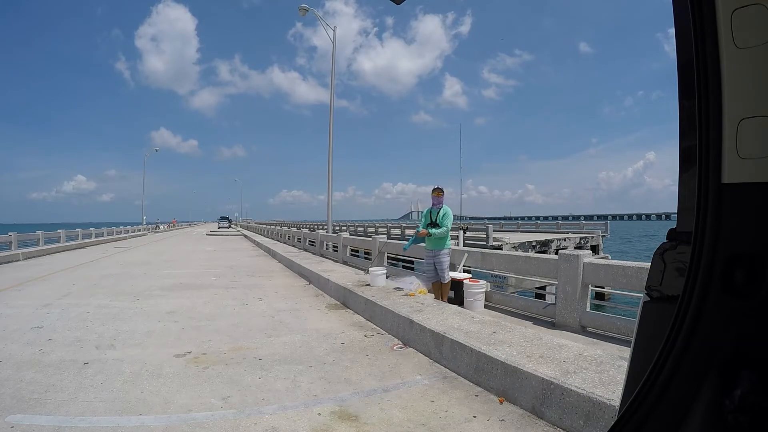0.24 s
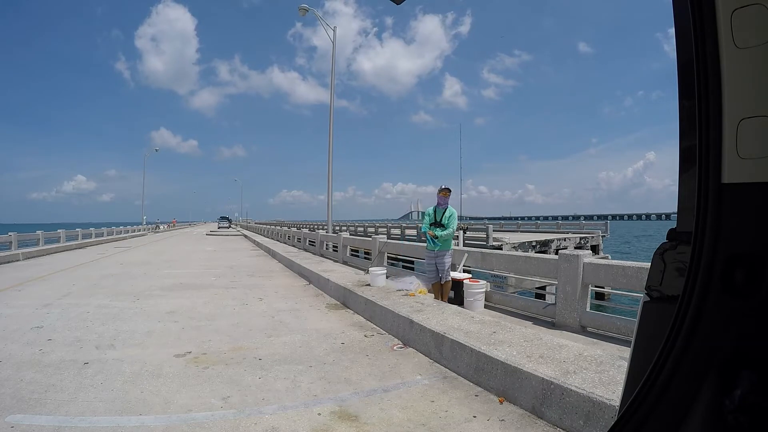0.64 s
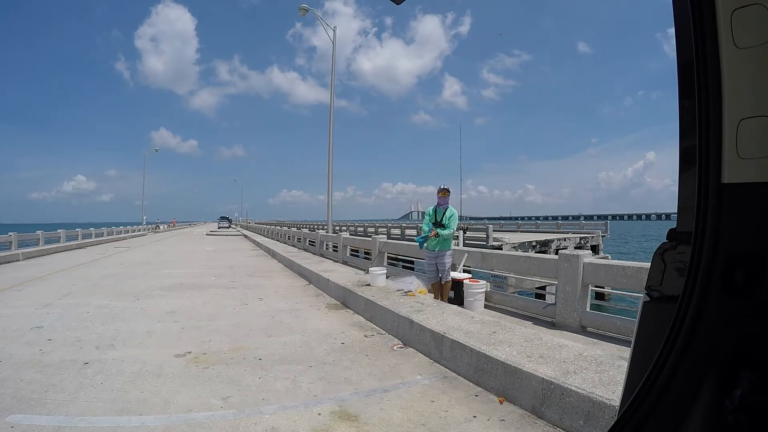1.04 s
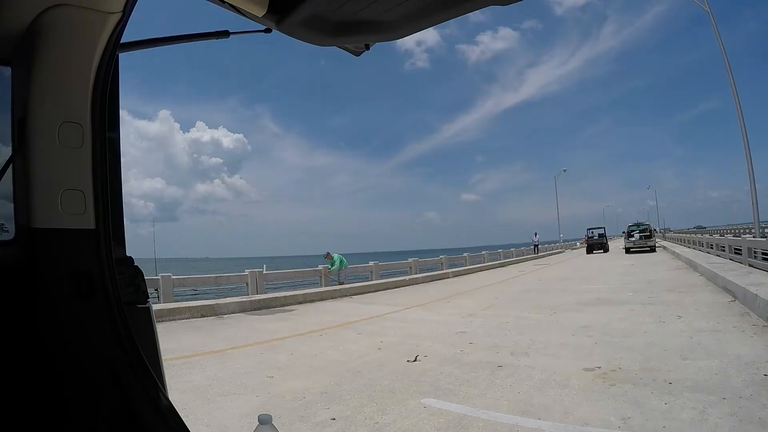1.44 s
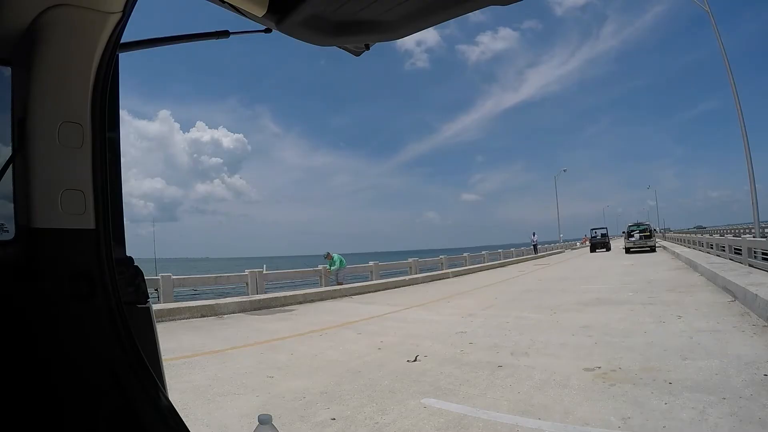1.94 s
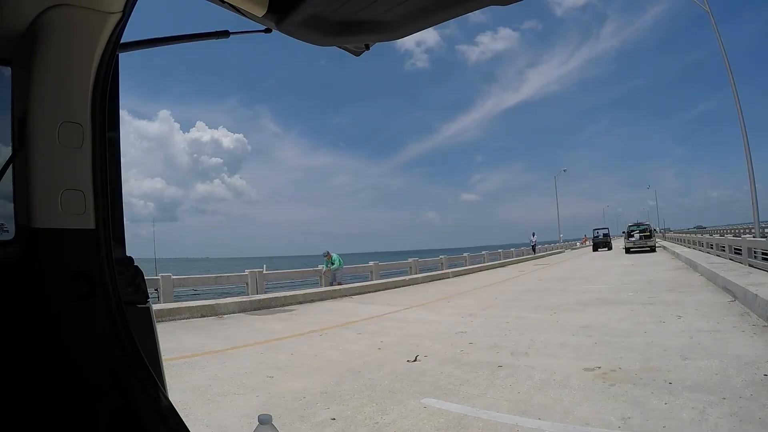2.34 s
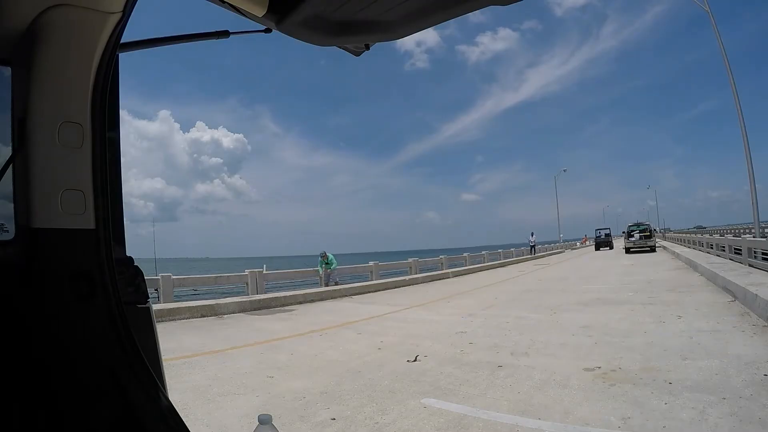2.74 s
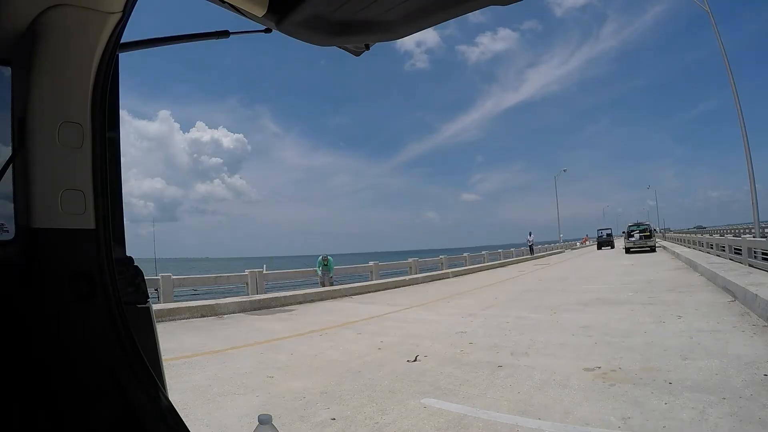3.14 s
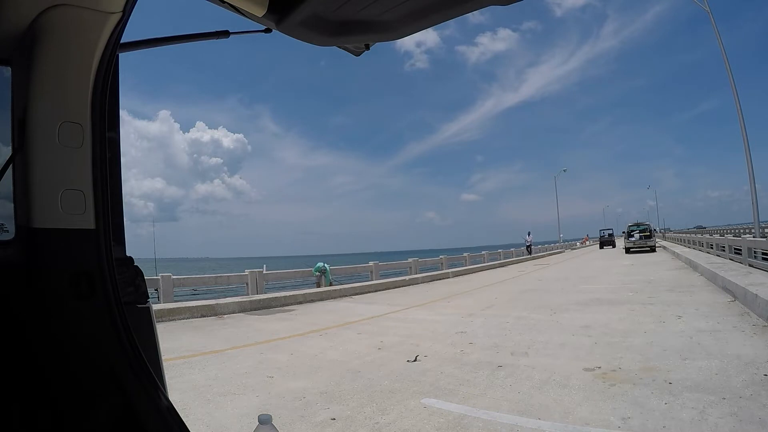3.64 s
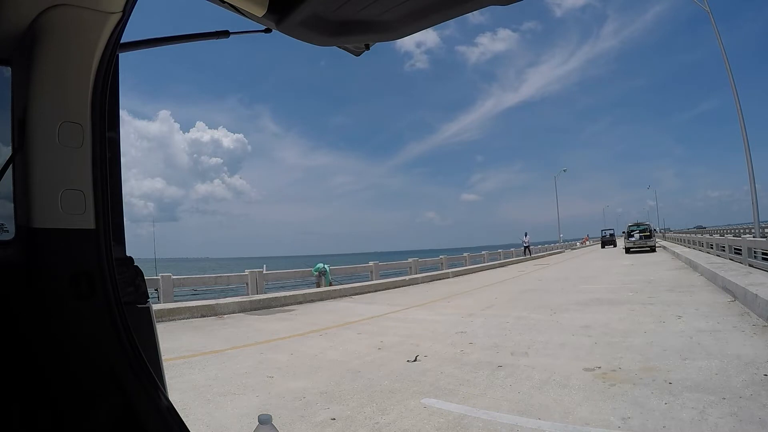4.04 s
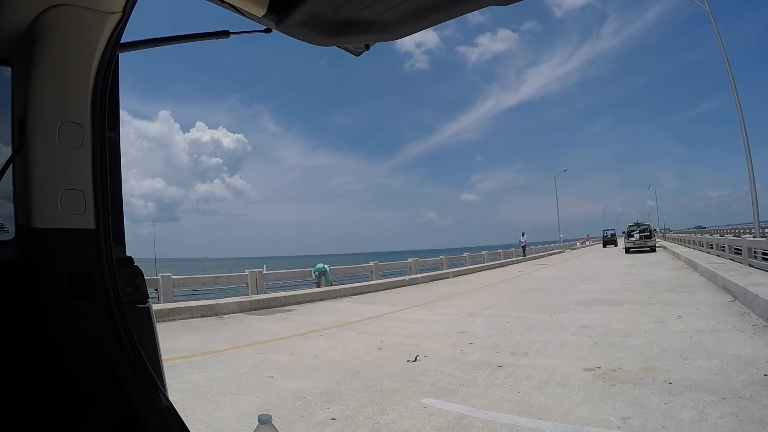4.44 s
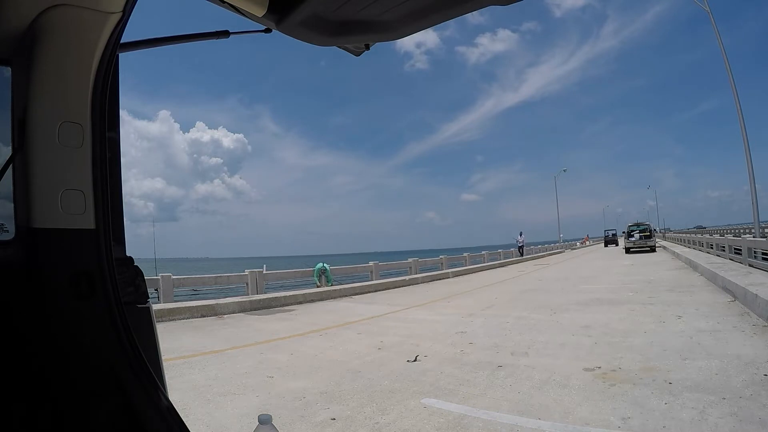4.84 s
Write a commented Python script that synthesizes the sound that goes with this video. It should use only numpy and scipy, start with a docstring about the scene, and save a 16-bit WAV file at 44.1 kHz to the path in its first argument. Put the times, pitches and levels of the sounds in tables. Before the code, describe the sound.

Outdoors on a pier, a quiet wash of wind and hiss lasts about a second before switching abruptly to a van idling near the microphone. Its low, pulsing exhaust hum carries a faint hollow drone from the body, fine mechanical clatter and a slight belt whine. Just past the middle, the engine speeds up a touch, then relaxes into a softer, darker idle that runs to the end.

```python
"""A van's engine idles close by on a long pier, heard at the open tailgate. Each firing sends a pulse
through the exhaust, a harmonic series, and knocks the block and hollow body into resonance; gears and
belts whine and air rushes in time. Near 3 s the load drops: the speed overshoots and settles, the sound
gets quieter and the exhaust slowly darkens. For the first 1.1 s there is only sea wind and distant hiss."""
import sys
import numpy as np
from scipy import signal
from scipy.fft import rfft, irfft
from scipy.io import wavfile
from scipy.ndimage import uniform_filter1d

SR = 44100
rng = np.random.default_rng(int(sys.argv[2]) if len(sys.argv) > 2 else 0)


def int16_out(signal):
    """Quantize to a 16-bit WAV file."""
    q = np.round(np.clip(np.atleast_2d(signal).T, -1, 1) * 32767)
    wavfile.write(sys.argv[1], SR, q.astype(np.int16))


N = 224468
TIME, HZ = np.arange(N) / SR, np.arange(N // 2 + 1) * SR / N

# Coherence of the two microphone ports: (frequency [Hz], shared power [0-1])
PORT_COHERENCE = [(30, 0.9), (60, 0.95), (150, 0.95), (400, 1), (1000, 0.88), (2000, 0.75), (4000, 0.45),
                  (7000, 0.11), (12000, 0.45)]
# Balance of the ports: (frequency [Hz], left minus right [dB])
PORT_BALANCE = [(60, -0.6), (690, -0.4), (1270, 0.5), (2330, -2), (4290, -3.5), (7890, -5.5), (14500, 0.5)]
# Spectra of sea wind, background rumble and engine air: (frequency [Hz], relative density [dB])
WIND_SPECTRUM = [(9, -36), (15, -8), (33, -3), (57, -2), (135, -18), (214, -21.5), (255, -25.5),
                 (400, -29.5), (700, -31.5), (1050, -30), (2000, -36.5), (3500, -46), (6000, -55),
                 (10000, -54.5), (15000, -61)]
RUMBLE_SPECTRUM = [(15, 0), (30, -1.5), (48, 3), (75, -2), (120, -4.5), (180, -10), (270, -14), (350, -11),
                   (460, -15), (650, -18), (780, -22.5), (1050, -15.5), (1300, -24.5), (2000, -49)]
AIR_SPECTRUM = [(410, -34), (700, -15), (1050, -9), (1670, -10.5), (2080, -7.5), (2430, -14), (4000, -18.5),
                (7500, -21.5), (9500, -24.5), (12000, -33.5), (14000, -42), (15000, -61)]
# Envelopes of engine air, body drone and block clatter: (time [s], gain [dB])
AIR_GAIN = [(1.14, -47), (2.0, -46.5), (2.2, -45), (2.46, -48), (2.62, -45), (3.05, -50), (4.4, -51),
            (4.7, -48.5), (5.09, -50.5)]
DRONE_GAIN = [(1.14, -52), (2.0, -48), (2.2, -51), (2.36, -43.5), (2.55, -50), (2.75, -47.5), (3.6, -51),
              (4.1, -47.5), (4.65, -54), (5.09, -52.5)]
CLATTER_GAIN = [(1.14, -43.5), (1.8, -41.5), (2.25, -48), (2.55, -43.5), (3.3, -46), (4.0, -45),
                (4.57, -49), (4.8, -46), (5.09, -45.5)]
# Modes of the hollow body and engine block: (frequency [Hz], width [Hz], relative level [dB])
BODY_MODES = [(531.4, 31, -4.5), (572.5, 21.5, 0), (641, 72, -2)]
BLOCK_MODES = [(1379, 65, -4), (1560, 56, -1.5), (1651, 45, -0.5), (1763, 40, -5), (2051, 100, -2),
               (2774, 160, -12.5), (2955, 44, -13.5), (3248, 110, -9.5), (3538, 146, -12), (4440, 52, -13),
               (5210, 80, -14.5), (7120, 150, -23)]
# Gear and belt tones: (multiple of the firing rate [1], amplitude relative to the clatter [dB])
WHINE_ORDERS = [(33, -20), (36, -18), (50, -8), (51, -13), (54, -17), (57, -15)]
# Engine speed: (time [s], firing rate [Hz])
FIRING_RATE = [(1.14, 30.668), (1.88, 30.749), (2.87, 31.618), (3.12, 30.931), (4.1, 30.257),
               (5.09, 30.572)]
# Resonances of silencer and tailpipe: (frequency [Hz], width [Hz], phase lag [rad])
PIPE_MODES = [(62, 24, .6), (150, 44, 2.2)]
# Exhaust harmonics with and without load: (multiple of the firing rate [1], relative level [dB])
LOADED_HARMONICS = [(1, -2.5), (2, -3), (3, -2), (4, -2.5), (5, 1), (6, -11.5), (7, -5), (8, -7.5),
                    (9, -21), (10, -19), (11, -11.5), (12, -7.5), (13, -17.5), (14, -27), (17, -16)]
UNLOADED_HARMONICS = [(1, -3.5), (2, -1.5), (3, -0.5), (4, -5.5), (5, -1.5), (6, -18.5), (7, -20.5),
                      (8, -16), (9, -23), (10, -19.5), (11, -17), (12, -12), (13, -22), (14, -25),
                      (17, -20)]

AIR_LAG_S, ENGINE_LAG_S = 6.34 / SR, 4.7 / SR  # later arrival at the left port


def undb(db):
    """Amplitude ratio of a level in decibels."""
    return 10 ** (np.asarray(db) / 20)


def level(x, db):
    """Scaling to a given rms level."""
    return x * undb(db) / np.sqrt(np.mean(x ** 2))


def along(table):
    """Linear interpolation of a time table at every sample."""
    return np.interp(TIME, *np.transpose(table))


def across(table):
    """Interpolation of a spectrum on a log-frequency axis."""
    hz, value = np.transpose(table)
    return np.interp(np.log(HZ + 1), np.log(hz), value)


def walk(rate_hz):
    """Slow random modulation: held values, smoothed twice, with a spread near 1."""
    hold = int(SR / rate_hz)
    steps = np.repeat(rng.standard_normal(N // hold + 1), hold)
    return 1.37 * uniform_filter1d(uniform_filter1d(steps, hold), hold)[:N]


def fall(middle_s, length_s):
    """Half-cosine transition from 1 to 0."""
    return .5 - .5 * np.sin(np.pi * np.clip((TIME - middle_s) / length_s, -.5, .5))


def port_noise(lag_s):
    """Partial coherence: two noise spectra share a part that reaches the left port late."""
    shared, left, right = rfft(rng.standard_normal((3, N)))
    share = np.clip(across(PORT_COHERENCE), 0, 1)
    late = shared * np.exp(-2j * np.pi * HZ * lag_s)
    tilt = undb(across(PORT_BALANCE) / 2)
    pair = np.sqrt(share) * np.array([late, shared]) + np.sqrt(1 - share) * np.array([left, right])
    return pair * np.array([tilt, 1 / tilt])


def rush(spectrum, swell_db, flicker_db):
    """Modulated flow noise: octave bands swell together and flicker independently; rms 1."""
    noise = port_noise(AIR_LAG_S) * undb(across(spectrum))
    swell, out = swell_db * walk(5.04), 0
    for octave in range(3, 15):
        band = np.clip(1 - abs(np.log2(HZ + 1) - octave), 0, 1)
        out += irfft(noise * band, N) * undb(swell + flicker_db * walk(14))
    return level(out, 0)


def sea_wind():
    """Broadband noise: the wind's power lies in the bass, with distant hiss above it."""
    return rush(WIND_SPECTRUM, swell_db=.33, flicker_db=.68) * undb(-39.5)


def pulsation(cycles, depth_db, decay_cycles):
    """Amplitude modulation: the gain jumps once a firing, by a varying amount, then decays."""
    firing = np.floor(cycles).astype(int)
    size = 1 + .2 * rng.standard_normal(N // 1000)[firing - firing[0]]
    gain_db = depth_db * size * np.exp(-(cycles - firing) / decay_cycles)
    return undb(uniform_filter1d(gain_db, size=260))


def engine_air(cycles, brightness):
    """Flow noise of gas and fan pulses with the firings; under load faster gas hisses brighter."""
    air = rush(AIR_SPECTRUM, swell_db=.29, flicker_db=.84)
    air *= pulsation(cycles + .18, depth_db=5, decay_cycles=.43) * undb(along(AIR_GAIN))
    treble = signal.sosfilt(signal.butter(2, 10000, "high", fs=SR, output="sos"), air)
    return air + .63 * brightness * treble


def ring(cycles, modes, knock_db, waver_db):
    """Forced vibration: firing knocks and pulsing valve noise drive modes that each waver in level."""
    valves = irfft(port_noise(ENGINE_LAG_S), N) * pulsation(cycles + .043, depth_db=1.4, decay_cycles=1)
    fired = np.diff(np.floor(cycles + .003 * walk(5)), prepend=0) == 1
    knocks = rfft(level(fired * undb(1.8 * walk(20)), knock_db))
    drive = rfft(valves) + np.array([knocks * np.exp(-2j * np.pi * HZ * ENGINE_LAG_S), knocks])
    out = 0
    for centre_hz, width_hz, db in modes:
        response = 1 / (1 + 2j * (HZ - centre_hz) / width_hz) ** 2
        out += level(irfft(drive * response, N), db) * undb(waver_db * walk(4.17))
    return level(out, 0)


def body_drone(cycles):
    """Resonance of the van's hollow body, driven by the engine."""
    return ring(cycles, BODY_MODES, knock_db=-3, waver_db=.57) * undb(along(DRONE_GAIN))


def whine(cycles):
    """Engine orders: gears and belts give wavering tones at multiples of the firing rate."""
    tones = sum(undb(db + 2 * walk(2.97)) * np.sin(2 * np.pi * order * cycles + .5 * walk(6))
                for order, db in WHINE_ORDERS)
    return np.array([np.roll(tones, round(ENGINE_LAG_S * SR)), tones])


def block_clatter(cycles):
    """Impact excitation of the block's high modes; the whine shares their envelope."""
    clatter = ring(cycles, BLOCK_MODES, knock_db=-4, waver_db=.6)
    return (clatter + whine(cycles)) * undb(along(CLATTER_GAIN))


def exhaust(cycles, load, brightness, loaded_db=-31.5, unloaded_db=-35.5, lead_rad=.75):
    """Superposition: harmonics sum to one suction pulse a firing; those near a pipe resonance lag."""
    idle_hz = FIRING_RATE[0][1]
    swell_db, pulses = .5 * walk(15), 0
    for (order, on_db), (_, off_db) in zip(LOADED_HARMONICS, UNLOADED_HARMONICS):
        lag = sum(rad / (1 + (2 * (order * idle_hz - hz) / width) ** 2) for hz, width, rad in PIPE_MODES)
        db = brightness * on_db + (1 - brightness) * off_db + swell_db + 1.11 * walk(5.966)
        jitter = .023 * (order + 4) * walk(7.1)
        pulses -= undb(db) * np.cos(2 * np.pi * order * cycles + lead_rad - lag + jitter)
    pulses /= np.sqrt(uniform_filter1d(pulses ** 2, SR // 4))  # running rms of 1
    pulses *= undb(load * loaded_db + (1 - load) * unloaded_db)
    return np.array([np.roll(pulses, round(ENGINE_LAG_S * SR)) * undb(-.3), pulses])


def engine(first_firing_s=1.1495):
    """Periodic excitation: one phase, the integral of the firing rate, times every part."""
    cycles = np.cumsum(along(FIRING_RATE)) / SR
    cycles -= cycles[int(first_firing_s * SR)]
    load = fall(middle_s=2.985, length_s=.73)
    brightness = fall(middle_s=3.4, length_s=1.3)  # the treble fades later and more slowly
    pipe = exhaust(cycles, load, brightness)
    return pipe + block_clatter(cycles) + body_drone(cycles) + engine_air(cycles, brightness)


def scene(wind_end_s=1.1327, engine_start_s=1.143):
    """The wind fades to near silence; then the engine enters, superposed on the pier's steady rumble."""
    fade_out = np.clip((wind_end_s - TIME) / .031, 0, 1) ** 2
    fade_out = np.maximum(fade_out, undb(-28) * (TIME < engine_start_s))
    fade_in = np.clip((TIME - engine_start_s) / .033, 0, 1)
    wind, van = sea_wind(), engine()
    rumble = rush(RUMBLE_SPECTRUM, swell_db=.25, flicker_db=1.2) * undb(-42)
    return wind * fade_out + (van + rumble) * fade_in


def record(dry):
    """Band limiting: a steep low-pass filter removes the treble above 15.1 kHz."""
    return signal.sosfilt(signal.ellip(14, .2, 80, 15100, fs=SR, output="sos"), dry)


dry = scene()
out = record(dry)
int16_out(out)
```